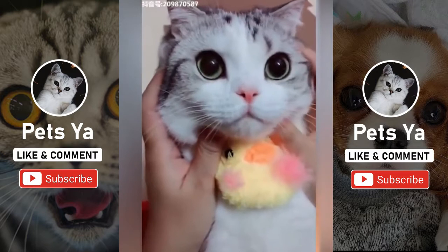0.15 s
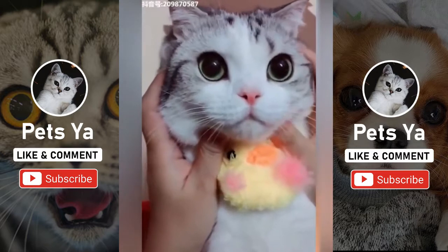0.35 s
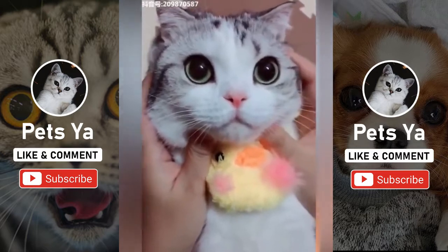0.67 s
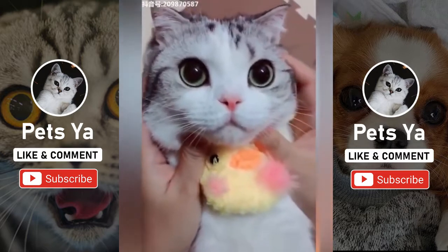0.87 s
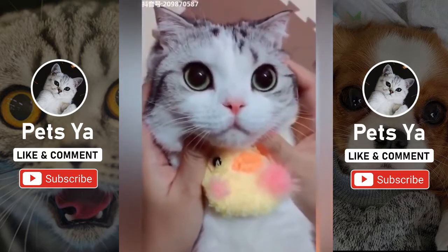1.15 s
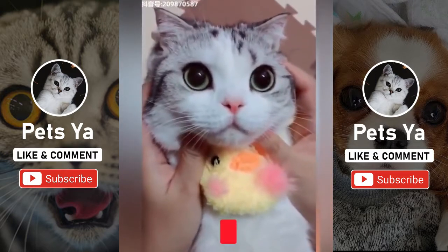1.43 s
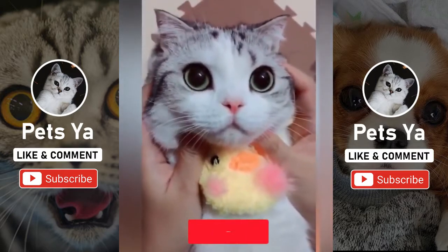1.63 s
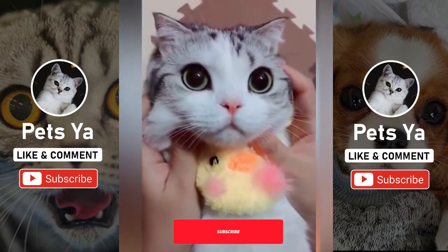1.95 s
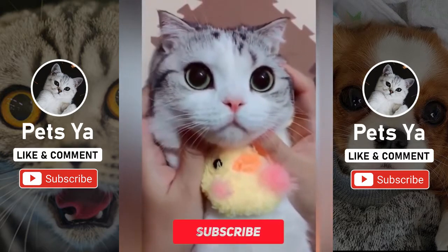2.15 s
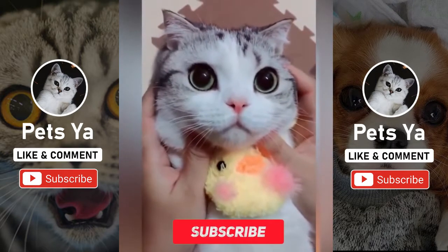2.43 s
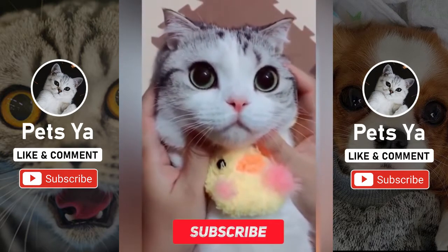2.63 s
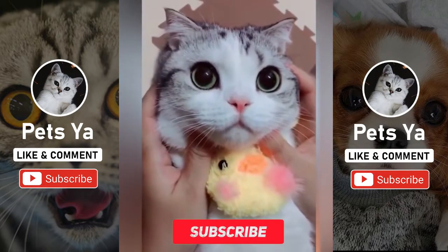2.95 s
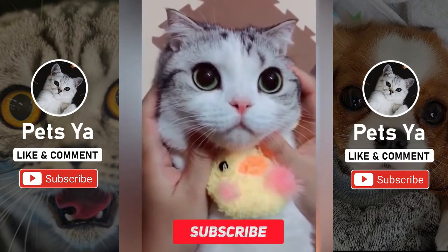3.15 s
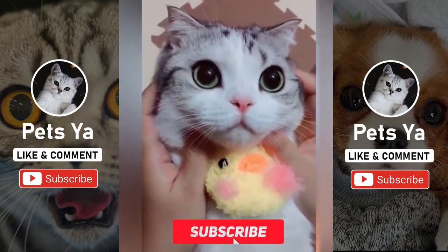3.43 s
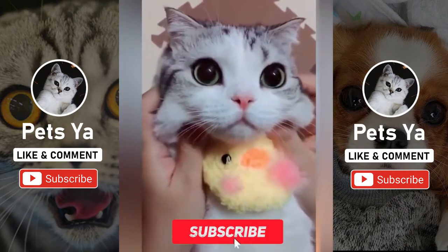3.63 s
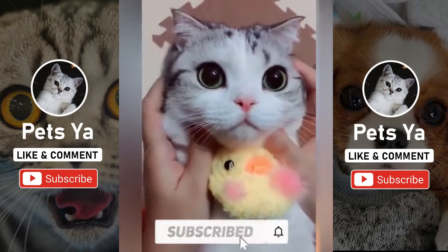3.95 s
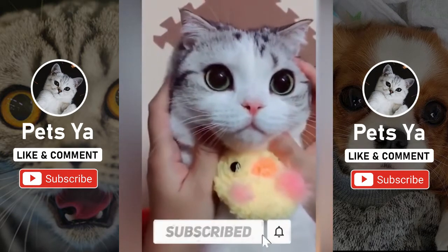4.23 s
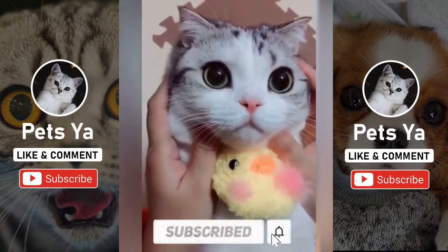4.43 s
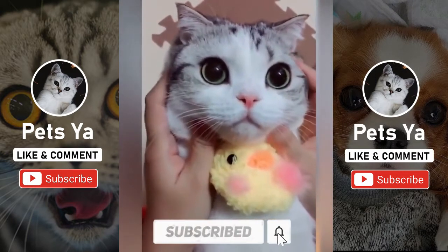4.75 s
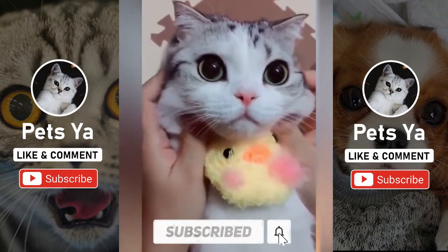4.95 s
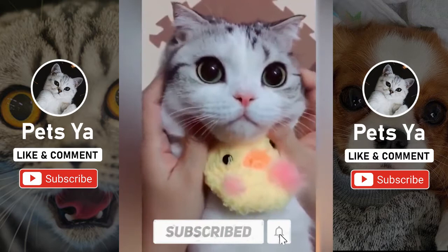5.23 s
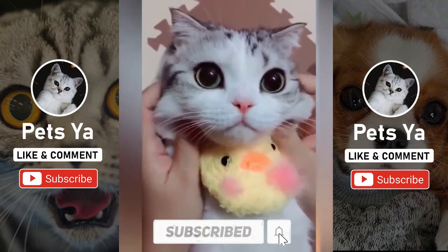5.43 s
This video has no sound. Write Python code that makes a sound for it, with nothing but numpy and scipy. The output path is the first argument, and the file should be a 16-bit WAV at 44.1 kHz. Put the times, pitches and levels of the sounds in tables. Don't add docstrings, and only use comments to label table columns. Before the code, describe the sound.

A plush toy's reed squeaker is heard very close to a phone in a small furnished room, with short reflections, faint steady hiss and lumpy low building rumble. At 0 s a squeak already under way stops, and a brighter rebound chirps at 0.1 s. Around 0.6 to 1 s come soft low finger bumps and tiny dry ticks, then a dull rub on the case near 1.4 s. At 2.2 s a firm, loud, piercing squeak breaks out with a puff of air, followed at 2.35 s by a weaker, longer indrawn squeak. After a faint rub and small ticks, the sharpest at 3.9 s, a gentler squeak at 4.04 s releases into two lower overlapping tones until 4.3 s. A slow rub lasts from 4.65 to 5.1 s. Two hard, raspy squeaks at 5.1 and 5.4 s leap higher and drop, each with softer overlapping rebounds, the last running into the end.

```python
import sys
import numpy as np
from scipy import signal
from scipy.fft import rfft, irfft, next_fast_len
from scipy.io import wavfile
from scipy.ndimage import uniform_filter1d, minimum_filter1d, map_coordinates

SR = 44100
rng = np.random.default_rng(int(sys.argv[2]) if len(sys.argv) > 2 else 0)


def gain_from_decibels(decibels):
    exponent = np.asarray(decibels, float) / 20
    return 10 ** exponent


def transcribe(u):
    v = np.clip(np.atleast_2d(u).T, -1, 1)
    q = np.round(v * 32767).astype(np.int16)
    wavfile.write(sys.argv[1], SR, q)


N = 246544

# hz, level_db
AIR = [(300, -71), (900, -35.5), (1800, -12.5), (3800, -3), (6000, -3.5), (10000, -7.5), (13000, -20),
       (16000, -40)]


def along(points, hz):
    point_hz, value = np.transpose(points)
    return np.interp(np.log(hz + 1), np.log(point_hz + 1), value)


def unit(x):
    return x / np.sqrt(np.mean(x ** 2) + 1e-20)


def noise(spectrum, size=N):
    m = next_fast_len(size)
    gain = gain_from_decibels(along(spectrum, np.fft.rfftfreq(m, 1 / SR)))
    return unit(irfft(rfft(rng.standard_normal(m)) * gain, m)[:size])


def wobble(rate_hz, size=N):
    knots = rng.standard_normal(int(size * rate_hz / SR) + 4)
    return map_coordinates(knots, [np.arange(size) * rate_hz / SR])


def add(track, start_s, x):
    i = round(start_s * SR)
    track[max(i, 0):i + len(x)] += x[max(-i, 0):N - i]


def hiss_floor():
    # hz, density_db
    hum = [(59, -29.5), (100, -3.5), (218, -11.5), (293, -15.5), (627, -20.5), (712, -25), (898, -22),
           (1620, -31.5), (3610, -34.5), (15500, -59.5)]
    level_db = -57 + .7 * wobble(3) + .8 * wobble(32)
    return gain_from_decibels(level_db) * noise(hum)


def building_rumble():
    # centre_s, width_s, swell_db
    swells = [
        (1.65, .45, 9),
        (2.77, .2, 5),
        (3.701, .3, 7),
        (4.95, .3, -7),
        (5.6, .15, 5.5),
    ]
    # hz, density_db
    building = [(12, -34), (20, -0.5), (54, -2.5), (90, -5), (120, -30), (200, -120)]
    t = np.arange(N) / SR
    level_db = -68 + sum(db * np.exp(-((t - s) / width_s) ** 2) for s, width_s, db in swells)
    return gain_from_decibels(level_db + 3 + 4.9 * wobble(11)) * noise(building)


def finger_rub():
    # reached_s, hold_s, level_db, rise_db_per_s, fall_db_per_s
    rubs = [
        (1.39, .13, -46, 260, 75),
        (2.5, 0.038, -50.5, 35.5, 56),
        (4.66, .44, -46, 120, 400),
        (5.27, 0.021, -51.5, 71, 250),
    ]
    # hz, density_db
    case = [(15, -41.5), (25, -12), (65, -15.5), (115, -1.5), (152, -3.5), (288, -6), (1370, -37),
            (3000, -48.5), (3900, -78), (6600, -120)]
    # hz, density_db
    slide = [(15, -42.5), (25, -13), (240, -0.5), (381, -9.5), (655, -11), (832, -25.5), (920, -24),
             (3000, -43.5), (3900, -73), (6600, -120)]
    x, t = np.zeros(N), np.arange(N) / SR
    case_noise = noise(case)
    colours = [noise(slide), case_noise, case_noise, case_noise]
    for (s, hold_s, db, rise, fall), colour in zip(rubs, colours):
        rub = colour * gain_from_decibels(1.5 * wobble(33))
        press_db = db - rise * np.maximum(s - t, 0) - fall * np.maximum(t - s - hold_s, 0)
        x += gain_from_decibels(uniform_filter1d(press_db, size=2000)) * rub
    return x


def finger_bumps():
    # start_s, level_db, start_hz, end_hz, length_s
    bumps = [
        (0.621, -43, 1115, 281.3, 0.011),
        (0.634, -42, 150, 70, .022),
        (0.69, -43.5, 595, 198, .012),
        (.697, -37.5, 151, 54.6, 0.031),
        (5.277, -44, 196, 39, 0.043),
    ]
    # hz, level_db
    crackle = [(300, -9), (1000, -1), (2200, -1), (4000, 0.5), (6000, -12.5), (9000, -42)]
    x = np.zeros(N)
    for s, db, start_hz, end_hz, length_s in bumps:
        u = np.arange(0, 1, 1 / (length_s * SR))
        sweep_hz = end_hz + (start_hz - end_hz) * np.exp(-3 * u)
        push = gain_from_decibels(2.8 * wobble(272, len(u))) * np.sin(2 * np.pi * np.cumsum(sweep_hz) / SR)
        envelope = np.sin(np.pi * u) ** 0.73
        add(x, s, gain_from_decibels(db) * envelope * (push + gain_from_decibels(-27.5) * noise(crackle, len(u))))
    return x


def fabric_ticks():
    # start_s, peak_db, ring_hz, decay_cycles
    ticks = [
        (0.6264, -63, 3850, 0.77),
        (0.6963, -57, 2245, 0.62),
        (0.705, -54, 4000, 0.81),
        (0.791, -53, 3550, 0.8),
        (0.9178, -55, 3730, 0.8),
        (0.9655, -46.5, 3980, 0.57),
        (2.952, -59.5, 3900, 0.8),
        (3.1195, -57, 3640, 0.73),
        (3.8894, -37, 3000, 0.28),
        (3.9592, -49, 3260, 0.56),
    ]
    x = np.zeros(N)
    for s, peak_db, hz, decay_cycles in ticks:
        cycles = np.arange(200) / SR * hz
        envelope = cycles / decay_cycles * np.exp(1 - cycles / decay_cycles)
        add(x, s, gain_from_decibels(peak_db + 9.5) * envelope * np.sin(2 * np.pi * cycles) / 2)
    return x


def room(x, decay, delay_s):
    # hz, level_db
    soft_walls = [(1000, 2), (2500, -4.5), (5000, -2), (9000, 2), (14000, -2.5)]
    hz, t, z = signal.stft(rng.standard_normal(SR // 2), SR, nperseg=128)
    level_db = along(soft_walls, hz)[:, None] - 60 * t / along(decay, hz)[:, None]
    tail = signal.istft(z * gain_from_decibels(level_db), SR, nperseg=128)[1]
    delayed = np.pad(x, (round(delay_s * SR), 0))
    return signal.fftconvolve(delayed, tail / np.linalg.norm(tail))[:N]


def air_puffs():
    # start_s, level_db, length_s
    puffs = [
        (0.092, -45, .01),
        (2.17, -43.5, .016),
        (4.006, -50, 0.026),
        (5.089, -46.5, .02),
    ]
    x, air = np.zeros(N), noise(AIR)
    for s, db, length_s in puffs:
        u = np.arange(0, 1.3, 1 / (length_s * SR))
        envelope = gain_from_decibels(db - 21 * (0.5 - u)) * np.minimum(6 * u, 1)
        add(x, s, envelope * air[round(s * SR):][:len(u)])
    return x


def grip(strokes, name, speaks_hz=None, choke_db=0.0, opens_db=0.0):
    grips = {"opening": (.4, 1.3, 2.2, 0.45, .11, 0.0066), "rebound": (.3, 0.71, 1.6, .9, .26, .0105),
             "squeeze": (.34, 0.76, 2.1, .72, .055, 0.011), "gentle": (0.4, .9, 0.95, .1, .075, 0.0087),
             "hard": (.42, 1.5, 1.7, .12, 0.038, .012), "long": (.1, .7, 1.3, .6, .14, 0.014),
             "suck": (.12, .7, 1.4, 1.1, 0.16, .007), "swelling": (0.23, .6, 1.45, .8, 0.2, 0.01),
             "muffled": (.27, .85, 1.1, 0.68, 0.093, .009), "stray": (0.23, .8, 1.6, 1.1, .03, 0.0067),
             "whistle": (.5, .8, 1.8, .9, .02, .008)}
    rise_share, swell, bend, db_per_pct, drop, drop_s = grips[name]
    u, curves = np.linspace(0, 1, 40), []
    for s, length_s, top_hz, end_hz, db in strokes:
        first_hz = speaks_hz or .94 * top_hz
        up = np.clip(u / rise_share, 0, 1)
        down = np.clip((u - rise_share) / (1 - rise_share), 0, 1)
        dying = np.exp((u - 1) * length_s / drop_s)
        rise_hz = (top_hz - first_hz) * np.sin(np.pi / 2 * up) ** swell
        sag_hz = (top_hz - end_hz) * np.sin(np.pi / 2 * down) ** bend
        hz = (first_hz + rise_hz - sag_hz) * (1 - drop * dying)
        covered_db = opens_db * np.maximum(1 - u / .65, 0)
        level_db = db - db_per_pct * 100 * (1 - hz / top_hz) - choke_db * dying - covered_db
        curves.append(np.c_[s + u * length_s, hz, level_db])
    return curves


def reed(strokes, pipe, air, rough, hiss_db, rise=0.0016, fall=0.0083, skew=.3, linger=.004, pop_db=-40, count=14):
    # hz, lift_db
    sheen = [(11500, 0.5), (13500, 5), (15300, 18)]
    out, k = np.zeros(N), np.arange(1, count + 1)[:, None]
    for rows in strokes:
        s, hz, db = np.transpose(rows)
        t = np.arange(s[0] - .008, s[-1] + .06, 1 / SR)

        def smooth(values):
            return uniform_filter1d(np.interp(t, s, values), size=300, mode="nearest")

        early = np.maximum(s[0] + 0.0011 - t, 0) / rise * (s[0] > 0)
        after = np.maximum(t - s[-1] - .002, 0) * (s[-1] < N / SR - .01)
        jitter = rough * .012 * wobble(500, len(t))
        pitch_hz = smooth(hz) * (1 + jitter - 0.023 * early - 0.046 * np.minimum(after / fall, 9))
        phase = 2 * np.pi * np.cumsum(pitch_hz) / SR

        flutter_db = rough * np.sqrt(k) * 2.2 * np.array([wobble(200, len(t)) for _ in k])
        below_db = smooth(db) - db.max()
        swing_db = 0.019 * k * below_db - (early + after / fall) * (12 + 4 * k)
        colour_db = along(pipe, k * pitch_hz) + along(sheen, k * pitch_hz)
        gain = gain_from_decibels(smooth(db) + colour_db + swing_db + flutter_db)
        tone = np.sqrt(2) * np.sum(gain * np.cos(k * phase + skew * k * k), axis=0)

        gusts = gain_from_decibels(2.8 * wobble(45, len(t)))
        jet = (1 + 0.81 * np.cos(phase)) * gusts * noise(air, len(t))
        pop = gain_from_decibels(pop_db - 20 * early) * np.exp(-np.maximum(t - s[0], 0) / 0.0053)
        leak = gain_from_decibels(hiss_db - 6.1 * (early + after / linger)) + pop / 2
        add(out, t[0], tone * (1 + pop) + leak * gain_from_decibels(db.max() + 0.29 * below_db) * jet)
    return out


def shell_beat(strokes):
    # hz, level_db
    beat = [(120, -25), (250, -2), (600, 0.5), (900, 0)]
    shell_hz, beat_db = 3894, -45.5
    beats = []
    for rows in strokes:
        s, hz, db = np.transpose(rows)
        beats.append(np.c_[s, np.abs(3 * hz - shell_hz), db + beat_db])
    return reed(beats, beat, AIR, rough=.3, hiss_db=-59, count=1)


def toys():
    # start_s, length_s, top_hz, sagged_hz, top_db
    opening = [
        (-.03, .094, 1230, 1072, -13.5),
    ]
    rebound = [
        (.108, .144, 1494, 1360, -8.5),
    ]
    squeeze = [
        (2.188, .096, 1569, 1360, -6),
    ]
    gentle = [
        (4.039, .09, 1431, 1365, -15),
    ]
    hard = [
        (5.109, .104, 1764, 1356, -11.5),
        (5.384, .112, 1937, 1373, -11.5),
    ]
    long_suck = [
        (2.34, 0.19, 1278, 1207, -20),
    ]
    suck = [
        (4.241, .078, 1268, 1196, -15),
        (5.273, .099, 1265, 1282, -19),
        (5.522, .12, 1310, 1331, -20.5),
    ]
    muffled = [
        (4.162, .124, 1185, 1076, -9.5),
        (5.238, .133, 1204, 1107, -16),
        (5.498, .12, 1224, 1104, -21),
    ]
    # start_s, length_s, top_hz, sagged_hz, top_db
    third = [
        (5.522, .053, 1419, 1332, -22),
    ]
    under = [
        (5.109, 0.0142, 1130, 1114, -24),
        (5.135, .06, 1295, 1282, -35),
        (5.386, .074, 1388, 1145, -30),
    ]
    lone_tones = [
        (5.138, .04, 2166, 2100, -24.5),
        (5.302, .053, 4480, 4326, -18.5),
    ]
    # hz, level_db
    opening_pipe, rebound_pipe = [ (1170, -16.5), (2330, -12.5), (3500, -6.5), (4670, 0), (5830, -6),
                                  (7000, -6.5), (8160, -12), (9330, -35.5), (10500, -37.5), (11660, -19),
                                  (12830, -49), (14000, -59.5), (15160, -65)], [ (1440, -11), (2890, -6.5), (4330, -3),
                                                        (5770, -20.5), (7220, -31), (8660, -21),
                                                        (10100, -10), (11540, -17.5), (12990, -29),
                                                        (14430, -37.5), (15870, -88)]
    squeeze_pipe, gentle_pipe = [ (1490, -11), (2980, -4.5), (4470, -2.5), (5950, -10), (7440, -14.5),
                                 (8930, -3), (10420, -14.5), (11910, -21), (13400, -28.5), (14890, -46.5),
                                 (16370, -102)], [ (1400, -9.5), (2800, -4.5), (4200, -2.5),
                                                       (5600, -3), (7000, -11), (8400, -17), (9800, -3.5),
                                                       (11200, -14.5), (12600, -30), (14000, -42),
                                                       (15400, -62.5)]
    hard_pipe, long_suck_pipe = [ (1300, -13), (1900, -15.5), (2700, -9), (3300, -3.5), (3900, -7),
                                 (4600, -6), (5400, 0.5), (6200, -11.5), (7200, -10), (8500, -18),
                                 (10000, -15.5), (12000, -41), (14000, -46), (16000, -101)], [ (1240, -4), (2480, 0), (3720, -2), (4970, -9.5),
                                                    (6210, -14.5), (7450, -29), (8690, -13), (9930, -17.5),
                                                    (11170, -5), (12410, -12), (13650, -35.5),
                                                    (14900, -33.5), (16140, -88.5)]
    suck_pipe, muffled_pipe = [ (1270, -9.5), (2540, -4), (3810, -0.5), (5080, -6.5), (6350, -18.5),
                               (7620, -33.5), (8890, -16.5), (10160, -9.5), (11430, -13.5), (12700, -23.5),
                               (13970, -35.5), (15240, -56.5)], [ (1150, -9), (2300, -5.5), (3460, -2.5), (4610, -23.5),
                                                  (5760, -31), (6910, -42), (8060, -48), (9220, -30.5),
                                                  (10370, -32.5), (11520, -27), (12670, -41.5),
                                                  (13820, -49), (14980, -71)]
    # hz, level_db
    thin_air = [(300, -60), (1000, -15.5), (2000, -14), (5500, -21), (7000, -6.5), (8200, -5), (10500, -16),
                (13500, -11.5), (16000, -32)]
    push_hz, pull_hz, muffled_hz = 1394, 1243, 1088

    opening_curves = grip(opening, "opening")
    rebound_curves = grip(rebound, "rebound", push_hz)
    squeeze_curves = grip(squeeze, "squeeze", push_hz)
    gentle_curves = grip(gentle, "gentle", push_hz, choke_db=6.5)
    third_curves = grip(third, "stray", 1420, choke_db=4.5)
    hard_curves = grip(hard, "hard", push_hz, choke_db=6)
    long_curves = grip(long_suck, "long", pull_hz, choke_db=11.5)
    suck_curves = grip(suck, "suck", pull_hz, choke_db=5.5)
    muffled_curves = grip(muffled[:1], "swelling", muffled_hz, choke_db=12.5, opens_db=7.5)
    muffled_curves += grip(muffled[1:], "muffled", muffled_hz, opens_db=2)
    under_curves = grip(under, "stray", choke_db=6.5)
    lone_tone_curves = grip(lone_tones[:1], "whistle", 1900) + grip(lone_tones[1:], "stray", 4485, choke_db=5)

    x = reed(opening_curves, opening_pipe, AIR, rough=.25, hiss_db=-22, skew=0.063, linger=0.044)
    x -= reed(rebound_curves, rebound_pipe, thin_air, rough=0.13, hiss_db=-35, pop_db=-18)
    x += reed(squeeze_curves, squeeze_pipe, AIR, rough=0.22, hiss_db=-26.5,
              rise=.0015, fall=0.0037, linger=.035, pop_db=-3)
    x += reed(gentle_curves + third_curves, gentle_pipe, thin_air, rough=0.25, hiss_db=-23.5,
              rise=0.0013, fall=.003, linger=.015, pop_db=-7.5)
    x += reed(hard_curves, hard_pipe, AIR, rough=0.41, hiss_db=-19.5,
              rise=.0015, fall=0.007, linger=0.065, pop_db=-4.0)
    x += reed(long_curves, long_suck_pipe, thin_air, rough=0.077, hiss_db=-36.5, rise=0.0031, pop_db=-12)
    x += reed(suck_curves, suck_pipe, thin_air, rough=0.11, hiss_db=-31.5)
    x += reed(muffled_curves + under_curves, muffled_pipe, thin_air, rough=.07, hiss_db=-41, rise=.006)
    x += gain_from_decibels(-3) * reed(lone_tone_curves, [(4600, -3.0), (8000, -60)], AIR, rough=.2, hiss_db=-63)

    x = signal.sosfilt(signal.butter(4, 750, "high", fs=SR, output="sos"), x)
    beating = rebound_curves + squeeze_curves + gentle_curves + [muffled_curves[0][12:]]
    return x + shell_beat(beating) + air_puffs()


def scene():
    # hz, t60_s
    near_walls = [(1000, 0.1), (3000, 0.092), (6000, 0.091), (12000, 0.031)]
    # hz, t60_s
    far_walls = [(1300, .13), (2500, .24), (5000, .24), (12000, .13)]
    squeaks = toys()
    pole = np.exp(-1 / (.16 * SR))
    loudness = np.abs(signal.lfilter([1 - pole], [1, -pole], np.abs(squeaks)))
    duck = gain_from_decibels(-6 * loudness / (loudness + 0.0048))
    near = gain_from_decibels(-13.5) * room(squeaks, near_walls, .003)
    far = gain_from_decibels(-21.5) * room(squeaks, far_walls, .008)
    handling = fabric_ticks() + finger_bumps() + finger_rub()
    return (squeaks + near + far + duck * hiss_floor() + building_rumble() + handling)[None]


def low_pass(x):
    return signal.sosfilt(signal.butter(12, 15710, fs=SR, output="sos"), x)


def record(dry):
    need = np.minimum(1, .86 / (np.abs(dry) + 1e-9))
    gain = uniform_filter1d(minimum_filter1d(need, size=400, axis=1), size=200, axis=1)
    m = next_fast_len(N)
    passed = np.fft.rfftfreq(m, 1 / SR) < 15720
    mix = irfft(rfft(dry * gain, m) * passed, m)[:, :N]
    return low_pass(mix)


dry = scene()
out = record(dry)
transcribe(out)
```